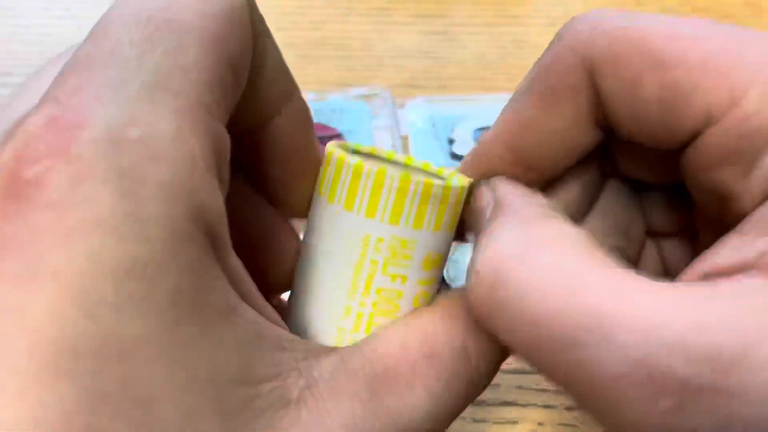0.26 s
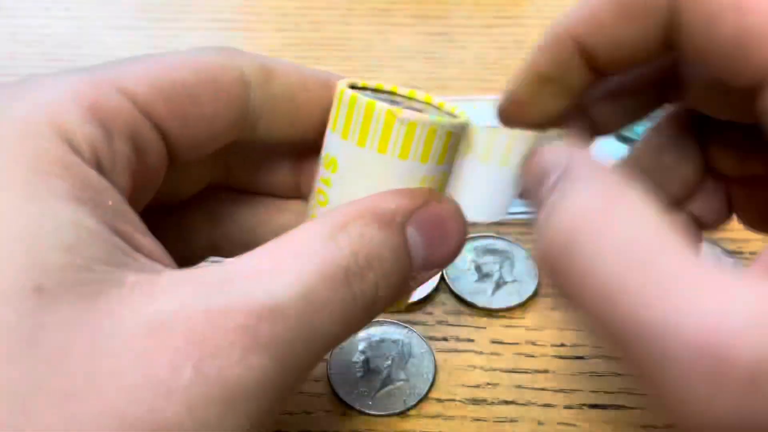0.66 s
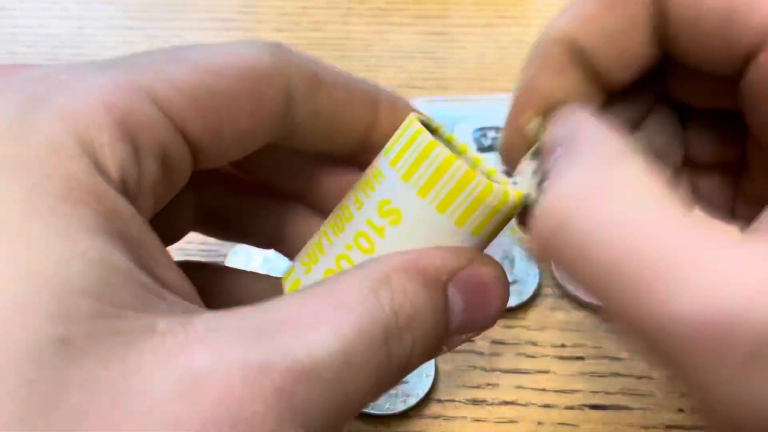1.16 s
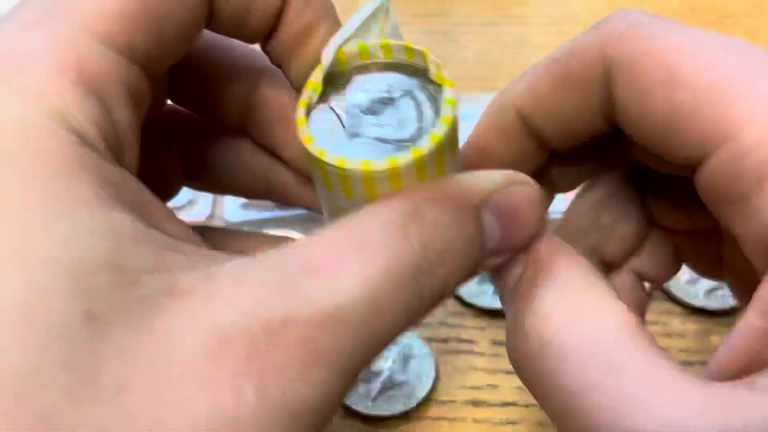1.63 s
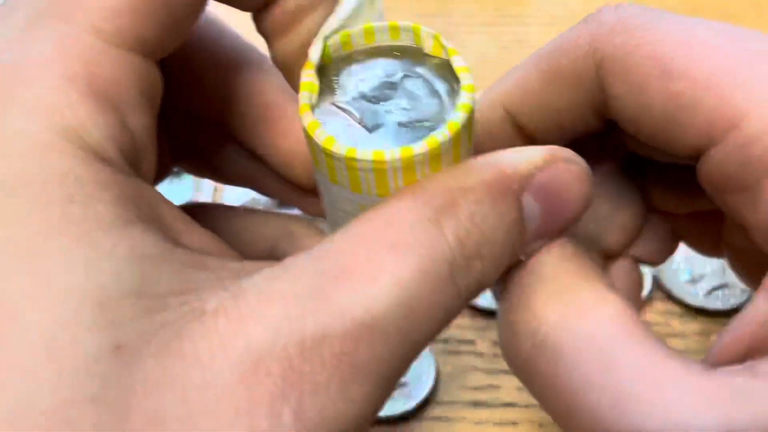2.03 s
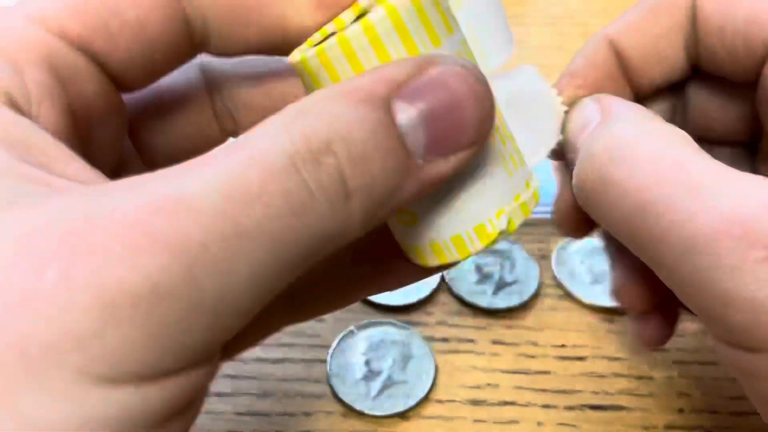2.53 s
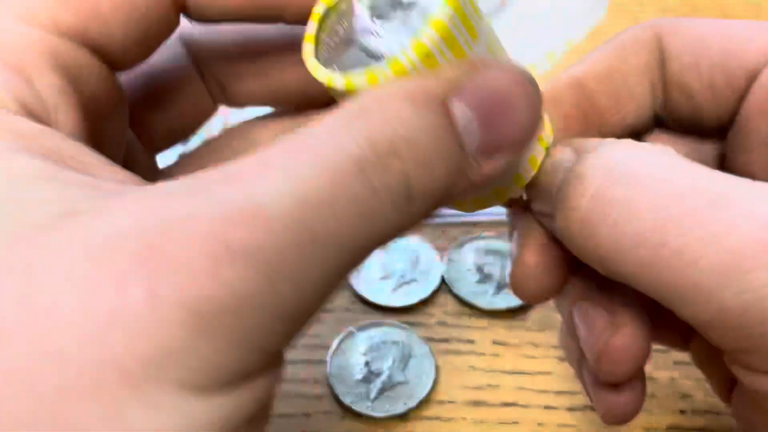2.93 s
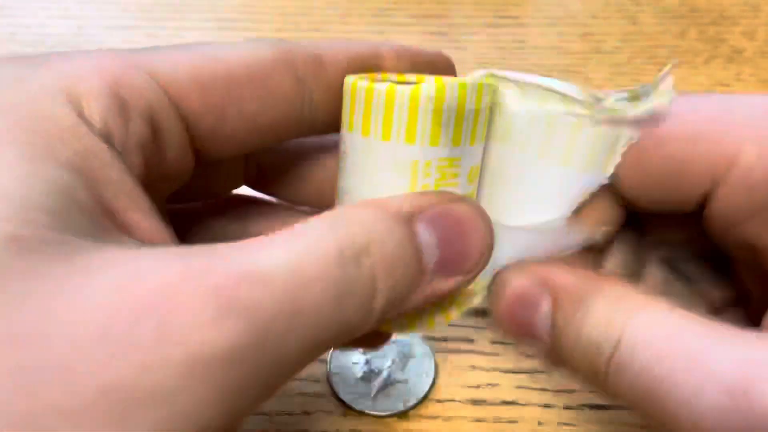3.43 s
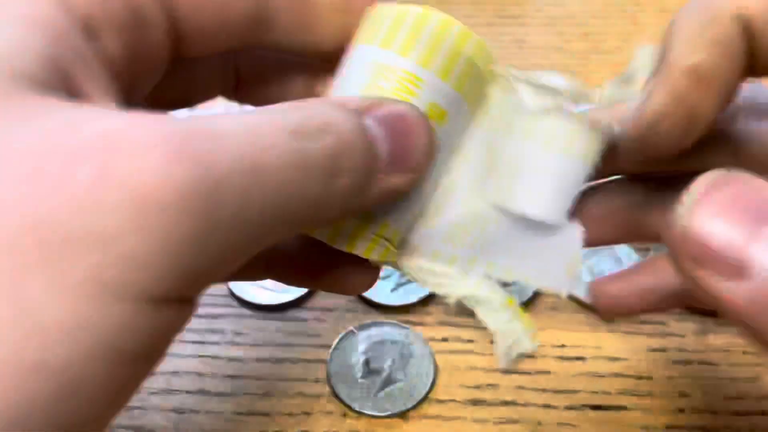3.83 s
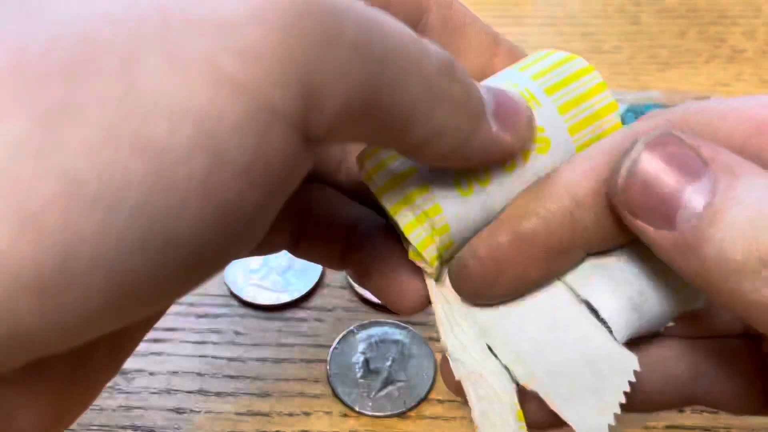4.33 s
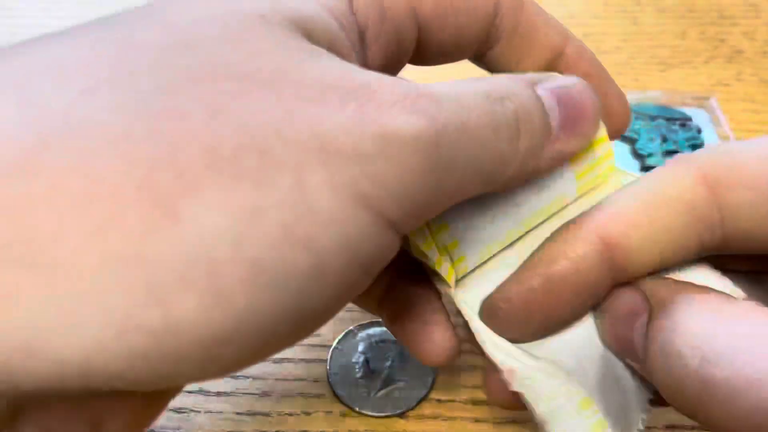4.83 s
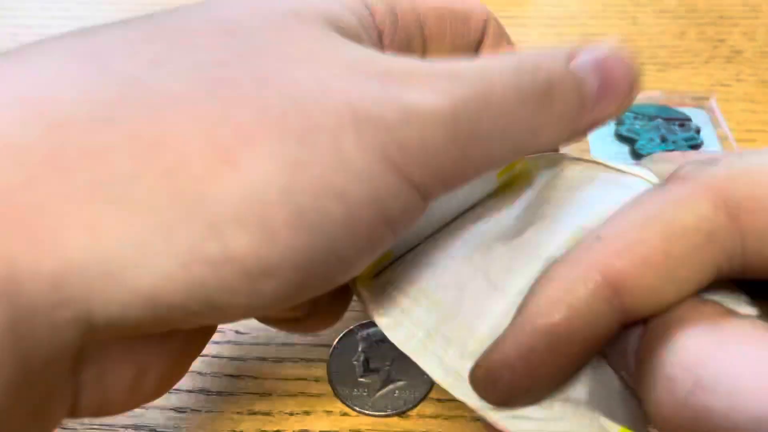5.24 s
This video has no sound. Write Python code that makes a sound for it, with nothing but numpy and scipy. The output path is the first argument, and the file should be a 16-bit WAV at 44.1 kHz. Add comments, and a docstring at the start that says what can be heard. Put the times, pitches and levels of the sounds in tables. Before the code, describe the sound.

Close, dry paper tearing: a falling rip, light rustles and snaps, another short rip, then thick crackling as the wrapper is peeled open indoors.

```python
"""Fingers tear the paper wrapper off a roll of coins, close to a phone, in a quiet room.
Rumble, hiss and handling open it; two long tears, near 0.3 s and 2.3 s, ring the loose flap at a sinking pitch.
Strokes (breaking fibre grains), creases (noise clicks), pops and bumps (dying sines) run on between them.
Snaps crowd from about 4.7 s almost to the end. The two microphone ports hear the treble out of step."""
import sys
import numpy as np
from scipy import signal
from scipy.fft import rfft, irfft, next_fast_len
from scipy.io import wavfile
from scipy.ndimage import uniform_filter1d, map_coordinates

SR = 44100
rng = np.random.default_rng(int(sys.argv[2]) if len(sys.argv) > 2 else 0)


def int16_out(signal):
    """Quantize to a 16-bit WAV file."""
    q = np.round(np.clip(np.atleast_2d(signal).T, -1, 1) * 32767)
    wavfile.write(sys.argv[1], SR, q.astype(np.int16))


N = 242285  # samples

# Levels and t60s are nominal: the functions add fixed offsets and limits.
# long tears round the roll: (start [s], rise [s], length [s], fall [s], fibre crackle [dB],
#   flap tone at start [Hz], at end [Hz], tone re fibres [dB])
TEARS = [(0.283, 0.032, 0.15, 0.034, -18, 5670, 950, -10),
         (2.3, 0.037, 0.11, 0.039, -22, 6740, 1290, -13.5)]
# flap, sheet, palm, tone re fibres at the start of a tear: ([dB], [dB], [dB], [dB])
TEAR_START_DB = (-16.5, -30, -46.5, -10.5)
# the same once the flap is loose: ([dB], [dB], [dB], [dB])
TEAR_LOOSE_DB = (0.5, -4, -23, -2)
# share of the tear after which each has come in: (flap [0-1], sheet [0-1], palm [0-1], tone [0-1])
LOOSE_AT_SHARE = (0.71, 0.83, 1.0, 0.46)
# short hand strokes on the paper: (time [s], rise [s], hold [s], fall [s], fibre crackle [dB],
#   flap re fibres [dB], sheet re fibres [dB], roll-in-palm re fibres [dB])
STROKES = [(0.194, 0.012, 0.083, 0.056, -46, -24, -16, -21),
           (0.54, 0.019, 0.042, 0.0098, -52.5, 5.5, -5, -9.5),
           (0.703, 0.018, 0, 0.058, -40.5, -10, -2, -13),
           (0.883, 0.048, 0.0069, 0.052, -46.5, -5.5, -8.5, -22),
           (1.015, 0.026, 0.003, 0.075, -35, -20.5, -43, -41),
           (1.18, 0.14, 0.033, 0.051, -33, -3, -14.5, -27), (1.356, 0.14, 0, 0.093, -49, 0.5, 5, -4.5),
           (1.929, 0.12, 0.0037, 0.054, -55.5, -9, -33, -33),
           (2.026, 0.03, 0.012, 0.0064, -45, -9, -24.5, -49.5),
           (2.127, 0.1, 0.034, 0.013, -60.5, -17, -28.5, -33.5),
           (2.214, 0.024, 0.095, 0.056, -35.5, -28.5, -21, -30.5),
           (2.504, 0.028, 0.0093, 0.088, -55, -11, 10.5, 6.5),
           (2.633, 0.33, 0, 0.041, -52, -0.5, -3.5, -11.5), (2.7, 0.05, 0.022, 0.017, -63, -0.5, 7, -2),
           (2.794, 0.071, 0.069, 0.087, -58.5, -10.5, -15, -10.5),
           (2.963, 0.075, 0.024, 0.064, -38.5, -4, -12.5, -20),
           (3.185, 0.059, 0.0029, 0.011, -44, -26, -44, -60), (3.243, 0.021, 0.04, 0.1, -54.5, -1, -6, 1.5),
           (3.306, 0.015, 0.048, 0.043, -37.5, -10, -9.5, -20),
           (3.383, 0.036, 0.047, 0.063, -31.5, 1, 0.5, -11.5),
           (3.552, 0.04, 0.047, 0.019, -41.5, 0, 2.5, -10),
           (3.738, 0.038, 0.00041, 0.11, -46.5, 0, 1.2, -25),
           (4.145, 0.029, 0.017, 0.073, -43, -1, -4, -17), (4.2, 0.097, 0.014, 0.05, -47, 15, 11, -18),
           (4.355, 0.22, 0, 0.05, -51, 1, 1.5, -23), (4.42, 0.018, 0.0018, 0.035, -42.5, -1, 7, 0),
           (4.653, 0.11, 0.0074, 0.029, -47.5, 2, 3.5, -47),
           (4.893, 0.22, 0.088, 0.027, -27.5, -2, -1, -35),
           (5.12, 0.15, 0.0075, 0.033, -33.5, -1.5, 0, -24),
           (5.208, 0.063, 0.036, 0.032, -26, -0.5, -0.5, -29.5),
           (5.271, 0.02, 0.0082, 0.052, -38, 7.5, 11.5, -20), (5.438, 0.26, 0, 0.11, -35.5, 2, 6, -21)]
# fingers working the wrapper: (time [s], fibre crackle [dB], flap re fibres [dB], palm re fibres [dB])
HANDLING = [(0, -100, -15, 5), (.16, -64, -21, -4.5), (.65, -61.5, 1.5, -9.5), (0.971, -85, -29, 17.5),
            (1.42, -65.5, -3.5, -8.5), (1.77, -62, -13.5, -26.5), (1.812, -86, -5.5, -22),
            (2.899, -82.5, -5.5, -21.5), (3.03, -62.5, -2, -9.5), (3.27, -48.5, 0.5, -21),
            (3.5, -63, -2, -4), (3.66, -67.5, 4, 2), (3.78, -59, 6.5, -1), (4.103, -47.5, 0, -9.5),
            (4.125, -65, -18, -16), (4.39, -65, 3, -1), (4.44, -48.5, 3.5, -19), (4.6, -65, -3.5, -0.5),
            (4.72, -52, 2.5, -19), (5.02, -64.5, 4, 1.5), (5.49, -68, -10, -2)]
# short tones rung on the paper, from a low hum under the first tear to high scrapes:
#   (time [s], rise [s], fall [s], level [dB], tone [Hz], width [re tone])
SHORT_TONES = [(.41, 0.075, 0.056, -42.5, 400, 0.18), (.882, 0.027, .025, -56.5, 920, 0.17),
               (1.185, 0.067, .04, -44, 3420, 0.086), (3.585, 0.064, 0.032, -34.5, 940, 0.051),
               (4.052, 0.024, 0.028, -40, 1640, 0.059), (4.094, .015, 0.025, -45, 1580, 0.097),
               (4.169, 0.05, 0.028, -42.5, 940, 0.032), (4.201, 0.1, 0.063, -35.5, 3880, 0.19)]
# creases and glue spots letting go: (time [s], level [dB], flap re level [dB], sheet re level [dB],
#   spray t60 [s])
SNAPS = [(0.246, -18, -41, -30, 0.0071), (0.2753, -20, -25, -19, 0.014), (.284, -23, -15, -36, .006),
         (0.3734, -22, -15, -28, .006), (0.57, -20, -13, -15, 0.03), (0.579, -38.5, -8, 6, 0.0058),
         (0.6986, -24.5, -7, -65, 0.045), (1.01, -32, -6, -55, 0.02), (1.0347, -16, -54, -54, 0.02),
         (1.358, -23.5, -6, -5.5, 0.0064), (2.031, -33, -32, -48, 0.026), (2.21, -16.5, -31, -46, 0.015),
         (2.229, -10.5, -25, -61, 0.005), (2.2373, -12, -27, -54, 0.0051), (2.246, -18, -36, -45, 0.005),
         (2.3012, -16, -33, -48, 0.012), (2.309, -11, -40, -49, 0.0054), (2.3166, 0, -49, -48, 0.014),
         (2.366, -27, -28, -35, 0.0091), (2.397, -11, -16, -37, .006), (2.4128, -18, -13, -19, 0.014),
         (2.426, -27, -4.5, -17, .008), (2.4994, -29.5, -4.5, 4, 0.014), (2.5091, -20.5, -4, -3.5, 0.017),
         (2.7607, -25.5, -12.5, -11.5, 0.033), (2.789, -18.5, -22, -22, 0.045),
         (2.824, -22, -49, -23, 0.051), (2.9476, -14, -7.5, -22, 0.048), (2.9519, -24.5, 9.5, -2.5, 0.013),
         (3.1005, -20, -12, -33, 0.075), (3.1843, -10.5, -22, -46, 0.022), (3.311, -15, -15, -45, 0.031),
         (3.376, -15, -7, -48, 0.032), (3.396, -13, -29, -15, 0.015), (3.424, -11, -29, -25, 0.015),
         (3.435, -18, 4, 0, 0.07), (3.541, -16.5, -44, -20, 0.0065), (4.347, -22.5, -10.5, -12, 0.033),
         (4.412, -29, -4, 1, 0.0093), (4.419, -2.5, -9, -15, 0.005), (4.447, -29, -1.5, 6.5, 0.015),
         (4.6506, -18.5, -17, -44, 0.031), (4.713, -28, -0.5, -35, 0.016), (4.763, -23.5, 0.5, -27, 0.046),
         (4.785, -14, 2.5, -47, 0.0053), (4.832, -12, -3.5, 5.5, 0.0039), (4.8477, -16, -4, -15, 0.012),
         (4.8755, -15, -16, 1, 0.0099), (4.8817, -7.5, -5, -2.5, 0.027), (4.912, -5, -9, -6, 0.02),
         (4.9162, -9.5, -6.5, 0, 0.012), (4.924, -11.5, -0.5, -8, .008), (4.9418, -18.5, 0, 3.5, 0.012),
         (4.974, -30, -4, -13, .008), (4.9774, -9, -2.5, -1, 0.012), (4.9832, 1.5, -47, -34, 0.0082),
         (5.049, -20.5, -1.5, 8, 0.0047), (5.0738, -9, -7.5, -8, 0.027), (5.107, -3.5, -11, -11.5, 0.0049),
         (5.115, -8, -16, -32, 0.0048), (5.121, -7.5, -0.5, -30, 0.006), (5.1375, -21, 3, -41, 0.0057),
         (5.1865, -10, -16, -16, 0.0081), (5.201, -7.5, -3, -3.5, 0.024), (5.213, -7.5, -8.5, -5, 0.042),
         (5.2449, -8.5, -18, -8, 0.0094), (5.263, -6, -12, -12, 0.0074), (5.2694, 0, -14, -21, 0.0036),
         (5.2715, -3, 1, -10, 0.005), (5.2733, -4, -20, -23, 0.0051), (5.2743, 6.5, -20, -23, 0.0044),
         (5.2937, -14, -6, -16, 0.0054), (5.4469, -14, -6, 0, 0.016)]
# taut paper popping: (time [s], level [dB], pitch [Hz])
POPS = [(.3155, -14, 3500), (.701, -27, 2220), (2.511, -23, 1560), (3.378, -12, 2750), (3.398, -13, 5000),
        (3.4365, -4, 5200), (4.4186, -3.5, 2700), (4.419, -6, 3600), (4.456, -29, 950),
        (4.8308, -8.5, 1450), (4.868, -17.5, 1520), (4.8835, -12, 1140), (4.9135, -11, 1310),
        (4.942, -26, 1510), (4.9778, -12.5, 1080), (5.0755, -18, 5000), (5.1225, -7, 3000),
        (5.214, -20, 1290), (5.278, -15.5, 920)]
# fingertips landing on the roll: (time [s], level [dB], pitch [Hz])
BUMPS = [(0.577, -33.5, 510), (0.701, -30.5, 504), (1.355, -34.5, 176), (1.358, -31, 538),
         (2.516, -31, 218), (2.765, -37, 600), (2.777, -38.5, 209), (3.264, -30.5, 214), (3.322, -33, 336),
         (3.398, -22, 307), (3.413, -20.5, 570), (3.459, -16, 604), (3.498, -41, 600), (3.583, -24, 530),
         (3.918, -33.5, 645), (4.4185, -26.5, 454), (4.4195, -33.5, 160), (5.272, -17, 785)]
# resonances of the torn edge: (centre [Hz], width [Hz], relative level [dB])
FIBRE_MODES = [(7190, 1400, -6.5), (7900, 7700, -11), (10090, 1260, 4.5), (12670, 3760, -1.5)]
# resonances of the loose flap: (centre [Hz], width [Hz], relative level [dB])
FLAP_MODES = [(2560, 340, -11.5), (3720, 3440, 3.5), (5130, 3000, 2.5), (7470, 3300, 7.5)]
# resonances of the whole sheet: (centre [Hz], width [Hz], relative level [dB])
SHEET_MODES = [(1060, 720, -3), (1526, 540, -1.5), (2395, 920, -2)]
# resonances of the roll in the palm: (centre [Hz], width [Hz], relative level [dB])
PALM_MODES = [(290, 240, 3), (557, 510, -3)]
# phase by which the left port leads: (frequency [Hz], lead [rad])
PORT_LEAD = [(0, 0), (860, .1), (1900, .7), (2400, .6), (2950, 1.9), (3900, .7), (5340, 0), (5850, -1.6),
             (6800, -1.6), (7600, -2.9), (9700, -3.3), (10700, -4), (12000, -5.8), (14000, -6.3)]
# left port over right: (frequency [Hz], level [dB])
PORT_LEAN = [(60, 1), (270, 4), (740, 5), (1220, 3.5), (2000, 5.5), (3330, 5.5), (5500, 1.5), (9000, 0)]
# port-to-port unrelated echo: (frequency [Hz], level [dB])
SCATTER = [(300, -13), (1200, -12), (2500, -5), (5000, -5.5), (9000, -11), (15000, -12)]
# room decay: (frequency [Hz], t60 [s])
ROOM_T60 = [(200, 0.12), (2000, 0.013), (12000, 0.24)]
# faint hiss spectrum: (frequency [Hz], relative level per Hz [dB])
HISS_SPECTRUM = [(300, -63), (600, -25), (1500, -11.5), (3000, -13.5), (7000, -17.5), (10000, -6),
                 (13000, -4)]
# rumble spectrum: (frequency [Hz], relative level per Hz [dB])
RUMBLE_SPECTRUM = [(20, -39), (38, -7.5), (45, -19.5), (56, -9.5), (75, -1.5), (88, -11), (104, -12.5),
                   (154, -6), (280, -22.5), (380, -37), (1500, -58), (1950, -76), (3300, -120)]
# rumble at the two ports: (frequency [Hz], left-right likeness [0-1])
RUMBLE_ALIKE = [(60, 0.97), (200, 0.93), (450, 0.11), (750, .1)]

TEAR_SAG_DB = 11.5  # fibres fade over a tear
HANDLING_SHEET_DB = -0.5  # re flap
EDGE_DB = 30  # gained over a rise time, lost over a fall time
LEAD_IN_S, SWELL_DB = .006, 35  # crackle swells by this much before a snap
RUMBLE_DB = -51.5
TOP_HZ = 15800


def strokes(fibre, flap, sheet):
    """Breaking fibres excite the edge, a slower drag excites the sheet, and both shake the flap."""
    tear = grains(per_s=4300, spread_db=1.0, clump_db=2.0, hiss=0.57)
    drag = grains(per_s=1300, spread_db=3.5, clump_db=3.0, hiss=0.7)
    edge = fibre * amp(-0.5) * ringing(tear, FIBRE_MODES)
    loose = flap * amp(-1.0) * ringing(0.58 * tear + 0.5 * drag, FLAP_MODES)
    whole = sheet * amp(-9.5) * ringing(drag, SHEET_MODES)
    return edge + loose + whole


def grains(per_s, spread_db, clump_db, hiss):
    """Fibres breaking at random moments, with uneven force, in clumps, over skin hiss."""
    struck = rng.random(N) < per_s / SR
    force = amp(spread_db * np.minimum(rng.exponential(size=N), 3))
    breaks = struck * rng.standard_normal(N) * force
    clumps = amp(clump_db * wobble(120))
    return unit(clumps * (unit(breaks) + hiss * rng.standard_normal(N)))


def effort():
    """Gain of fibres, flap, sheet and palm under all strokes, tears and handling."""
    t = np.arange(0, N + 32, 32) / SR
    knot_s, *cols = np.transpose(HANDLING)
    db, flap_db, palm_db = [np.interp(t, knot_s, c) for c in cols]
    gain = amp(db + np.array([0 * t, flap_db, flap_db + HANDLING_SHEET_DB, palm_db]))
    for s, rise, hold, fall, db, *rel_db in STROKES:
        level_db = db + envelope(t, s, rise, hold, fall)
        gain = gain + amp(level_db + np.array([0, *rel_db])[:, None])
    for s, rise, length, fall, db, *_ in TEARS:
        done, parts_db = loosening(t, s, length)
        level_db = db - TEAR_SAG_DB * done ** 2.2 + envelope(t, s, rise, length, fall)
        gain = gain + amp(level_db + np.array([0 * t, *parts_db[:3]]))
    return [np.interp(np.arange(N) / SR, t, g) for g in gain]


def envelope(t, s, rise, hold, fall):
    """dB under the peak: a straight rise, a hold, a straight fall; slopes last at least 3 ms."""
    rise, hold, fall = np.clip([rise, hold, fall], [.003, 0, .003], None)
    before = np.clip(s - t, 0, None) / rise
    after = np.clip(t - s - hold, 0, None) / fall
    return -EDGE_DB * (before + after)


def loosening(t, s, length):
    """Share of a tear done, and flap, sheet, palm and tone (dB re fibres) as the flap grows."""
    done = np.clip((t - s) / length, 0, 1)
    parts_db = [start + (loose - start) * np.clip(done / at, 0, 1)
                for start, loose, at in zip(TEAR_START_DB, TEAR_LOOSE_DB, LOOSE_AT_SHARE)]
    return done, parts_db


def drum():
    """Grains ring the flap at a pitch that sinks unevenly as it grows; short tones keep one pitch each."""
    source = grains(per_s=1300, spread_db=0.5, clump_db=0.7, hiss=0.55)
    hz, t, z = signal.stft(source, SR, nperseg=384)
    rings = []
    for s, rise, fall, db, tone_hz, width in SHORT_TONES:
        rings.append((db + envelope(t, s, rise, 0, fall), tone_hz + 0 * t, width))
    for s, rise, length, fall, db, from_hz, to_hz, tone_db in TEARS:
        done, parts_db = loosening(t, s, length)
        level_db = db + tone_db + parts_db[3] - 5 * done + envelope(t, s, rise, length, 0.88 * fall)
        glide_hz = to_hz * (from_hz / to_hz) ** ((1 - done) ** 2.1)
        uneven = 1 + 0.1 * wobble(70)[np.minimum(t * SR, N - 1).astype(int)]
        tone_hz = glide_hz * uneven
        rings.append((level_db, tone_hz, .2))
        rings.append((level_db - 9.5, 1.6 * tone_hz, .25))  # a second mode sinks with it
    gain = 0
    for level_db, centre_hz, width in rings:
        shape = 1 / (1 + ((hz[:, None] - centre_hz) / (width * centre_hz)) ** 2)
        gain = gain + shape * amp(level_db) / np.sqrt(np.mean(shape ** 2, axis=0))
    return signal.istft(z * gain, SR, nperseg=384)[1][:N]


def snaps():
    """Each crease swells with crackle, clicks and sprays breaking fibres; larger parts ring on longer."""
    t = np.arange(SR // 20) / SR - LEAD_IN_S
    after = np.clip(t, 0, None)
    swell = 0.17 * amp(SWELL_DB * t / LEAD_IN_S)
    click = 2.06 * amp(-60 * after / 0.0024)
    onset = 1.2 - np.exp(-after / 0.00037)
    push = np.zeros((3, N + len(t)))
    for s, db, flap_db, sheet_db, t60 in SNAPS:
        burst = rng.standard_normal(len(t))
        burst = np.sign(burst) * (0.13 + .5 * np.abs(burst))
        first = round((s - LEAD_IN_S) * SR)
        for part, rel_db, longer in zip(push, (-4, flap_db + 1.5, sheet_db - 4), (.8, 1.1, 1.4)):
            spray = .5 * amp(-60 * after / (longer * np.clip(t60, .003, .06)))
            shape = np.where(t < 0, swell, (click + spray) * onset)
            part[first:][:len(t)] += amp(db + rel_db) * burst * shape
    return sum(ringing(part[:N], modes)
               for part, modes in zip(push, (FIBRE_MODES, FLAP_MODES, SHEET_MODES)))


def knocks(rows, cycles, attack_s, low_hz):
    """Pops or bumps: a sine and a noise puff, dying 60 dB in the given cycles."""
    out, t = np.zeros(N + SR), np.arange(SR // 10) / SR
    for s, db, hz in rows:
        window = np.hanning(round(.6 * SR / hz))
        puff = unit(np.convolve(rng.standard_normal(len(t)), window, "same"))
        push = np.sin(2 * np.pi * hz * t) + 0.23 * puff
        decay = amp(db - 60 * t * hz / cycles)
        out[round(s * SR):][:len(t)] += decay * push * (1 - np.exp(-t / attack_s))
    return filtered(out[:N], lambda f: 1j * f / (low_hz + 1j * f))  # a small object radiates no deep bass


def grip(level):
    """Skin slips on the heavy roll with a dull rub."""
    return level * ringing(grains(per_s=1200, spread_db=2.0, clump_db=2.2, hiss=1.2), PALM_MODES)


def bending(x, depth_db):
    """The paper's colour drifts as it bends: broad random peaks that come and go."""
    z = signal.stft(x, nperseg=128)[2]
    field = uniform_filter1d(rng.standard_normal(z.shape), size=2, axis=0)
    field = uniform_filter1d(field, size=30, axis=1)
    return signal.istft(z * amp(depth_db * unit(field)), nperseg=128)[1][:N]


def ports(x):
    """The phone's body delays and shades the sound on its way to each port."""
    def half(hz):
        return amp(along(PORT_LEAN, hz) / 2) * np.exp(.5j * along(PORT_LEAD, hz))
    return filtered(x, lambda hz: np.array([half(hz), 1 / half(hz)]))


def tails(x, t60, colour, size):
    """Echoes: x through a fresh pair of decaying noise tails every size samples."""
    out = np.zeros((2, N + SR))
    for i in range(0, N, size):
        hz, t, z = signal.stft(rng.standard_normal((2, size)), SR, nperseg=64)
        decay = amp(-60 * t / along(t60, hz)[:, None])
        tail = signal.istft(z * decay, SR, nperseg=64)[1]
        wet = signal.fftconvolve(x[None, i:i + size], tail / np.linalg.norm(tail[0]), axes=1)
        out[:, i:i + wet.shape[1]] += wet
    return filtered(out[:, :N], lambda hz: amp(along(colour, hz)))


def hiss():
    """Faint steady hiss: shaped noise at a slightly wandering level."""
    noise = filtered(rng.standard_normal(N), lambda hz: amp(along(HISS_SPECTRUM, hz)))
    return amp(-75.5 + 1.4 * wobble(19)) * unit(noise)


def rumble():
    """The building's low drone, swelling a little: mid and side noise set the left-right likeness."""
    def response(hz):
        turn = np.arccos(np.clip(along(RUMBLE_ALIKE, hz), -1, 1)) / 2
        return amp(along(RUMBLE_SPECTRUM, hz)) * [np.cos(turn), np.sin(turn)]
    mid, side = filtered(rng.standard_normal((2, N)), response)
    level_db = RUMBLE_DB + 0.23 * wobble(1) + .9 * wobble(6.3) + [[.5], [-.4]]
    return amp(level_db) * unit(np.array([mid + side, mid - side]))


def amp(db):
    """Gain of a level in dB."""
    return 10 ** (np.asarray(db) / 20)


def unit(x):
    """x at rms 1."""
    return x / np.sqrt(np.mean(x ** 2) + 1e-20)


def along(points, hz):
    """(Hz, value) points read on a log axis."""
    f, v = np.transpose(points)
    return np.interp(np.log(hz + 1), np.log(f + 1), v)


def wobble(rate):
    """A smooth random curve, rate knots a second."""
    return map_coordinates(rng.standard_normal(int(N * rate / SR) + 4), [np.arange(N) * rate / SR])


def filtered(x, response):
    """x times a complex response of frequency."""
    m = next_fast_len(N + SR // 2)
    return irfft(rfft(x, m) * response(np.fft.rfftfreq(m, 1 / SR)), m)[..., :N]


def ringing(x, modes):
    """x through steep resonances, causally; white noise keeps its rms."""
    f = np.fft.rfftfreq(4096, 1 / SR)
    power = sum(amp(2 * db) * ((f * w) ** 2 / ((c * c - f * f) ** 2 + (f * w) ** 2)) ** 2
                for c, w, db in modes)
    cepstrum = irfft(np.log(power / np.mean(power) + 1e-9) / 2)
    cepstrum[1:2048] *= 2  # fold to minimum phase
    cepstrum[2049:] = 0
    return signal.fftconvolve(x, irfft(np.exp(rfft(cepstrum))))[:N]


def scene():
    """Paper and fingers, with quick echoes off moving hands and table, a faint room and rumble."""
    fibre, flap, sheet, palm = effort()
    bumps = amp(4.5) * knocks(BUMPS, cycles=6.16, attack_s=0.00091, low_hz=60)
    pops = knocks(POPS, cycles=11.3, attack_s=0.00058, low_hz=600)
    blows = snaps() + bumps + pops
    drifting = bending(strokes(fibre, flap, sheet) + hiss(), depth_db=3.0)
    close = drifting + drum() + grip(palm) + blows
    hands = tails(close, [(1000, 0.02)], SCATTER, size=SR // 24)
    room = tails(close, ROOM_T60, [(300, -8), (3000, -5.5), (12000, -50.0)], size=SR // 4)
    return ports(close) + hands + room + rumble()


def record(dry):
    """Rounds the loudest clicks gently, then limits the band: soft below 38 Hz, steep above TOP_HZ."""
    rounded = dry / (1 + np.abs(dry / .85) ** 4) ** (1 / 4)

    def band(hz):
        treble = 1 / (1 + (hz / TOP_HZ) ** 120) * (hz < 16800)
        return treble / (1 + (38 / (hz + 1)) ** 6)
    return filtered(rounded, band)


dry = scene()
out = record(dry)
int16_out(out)
```